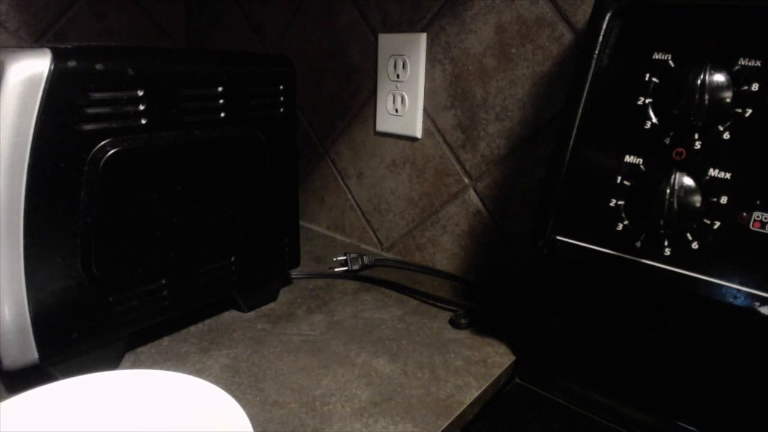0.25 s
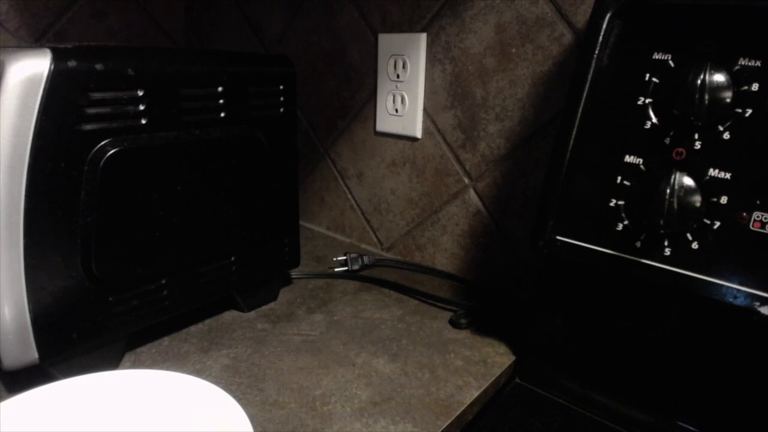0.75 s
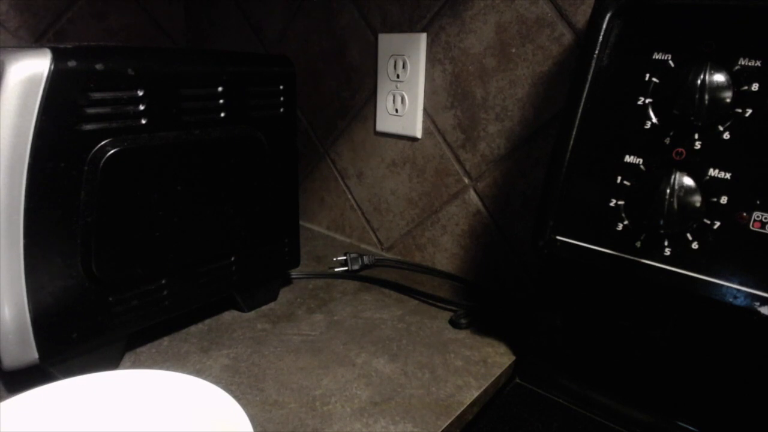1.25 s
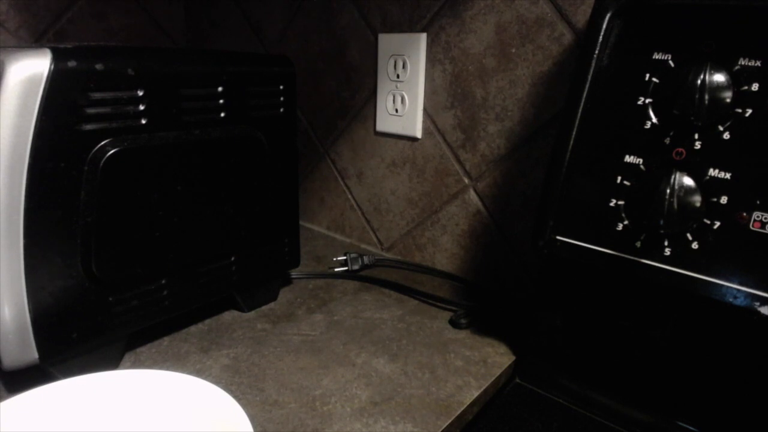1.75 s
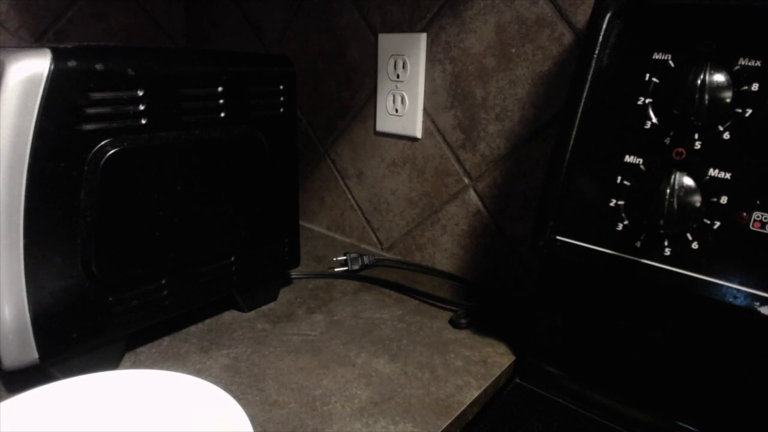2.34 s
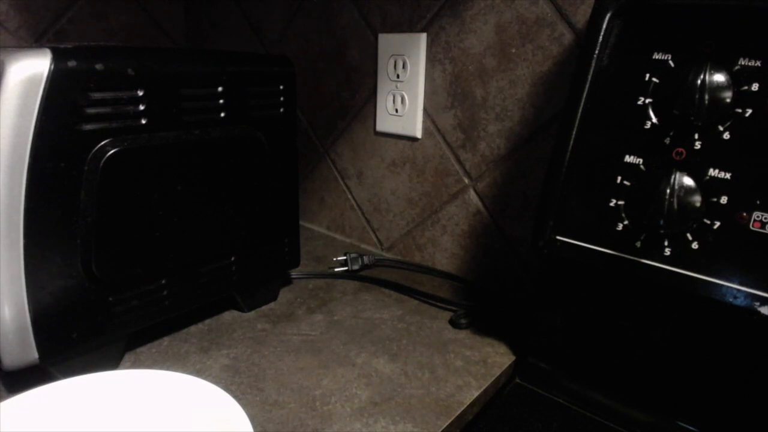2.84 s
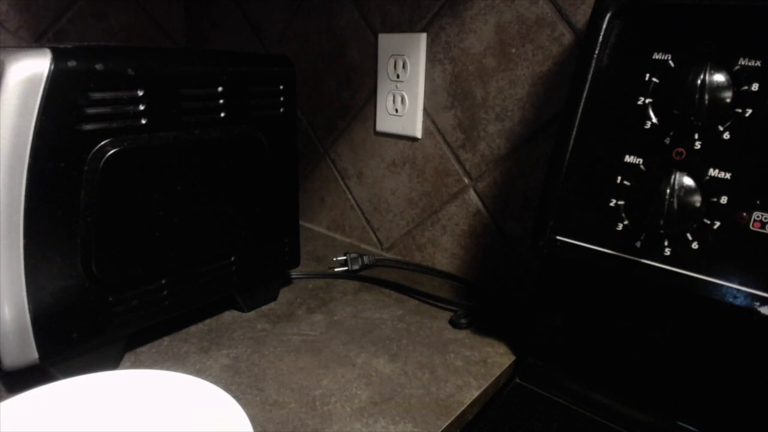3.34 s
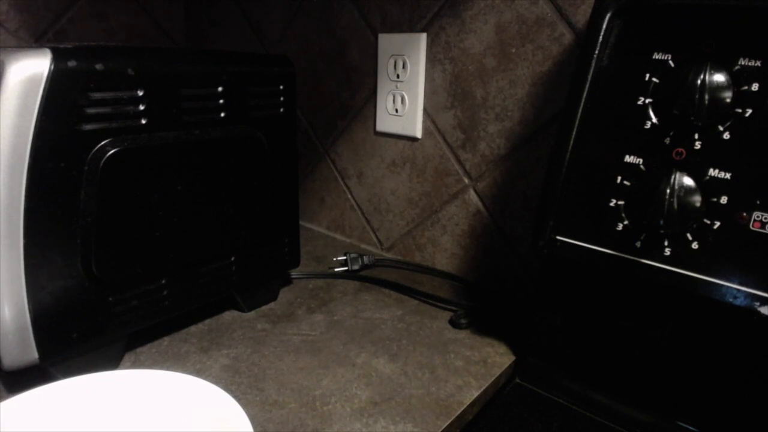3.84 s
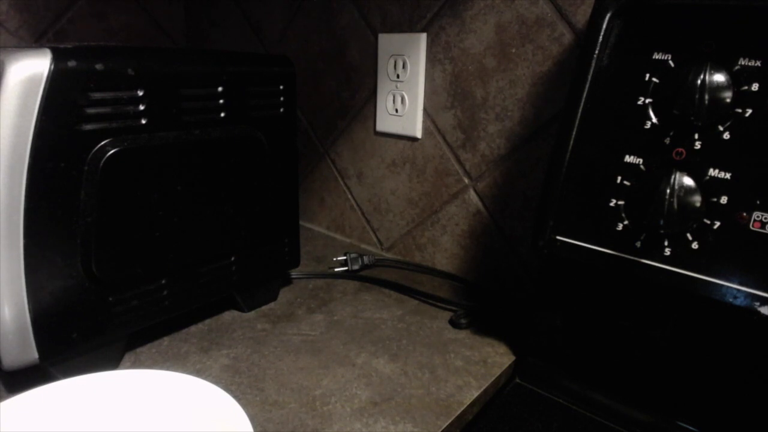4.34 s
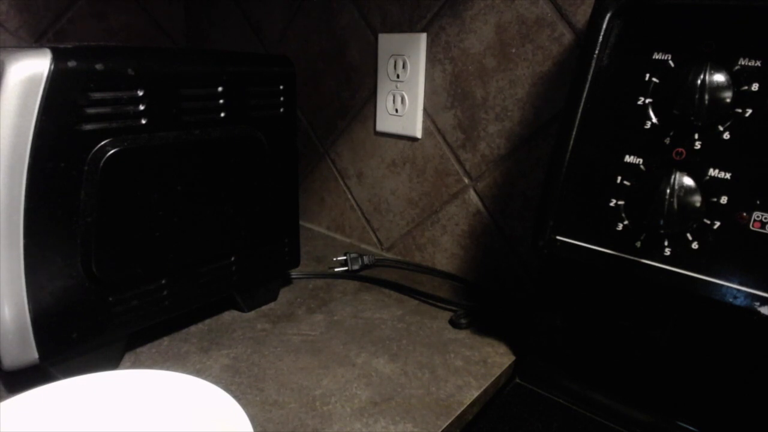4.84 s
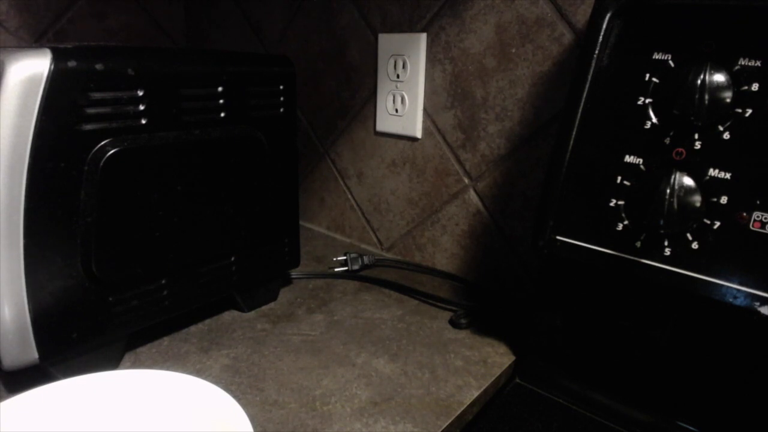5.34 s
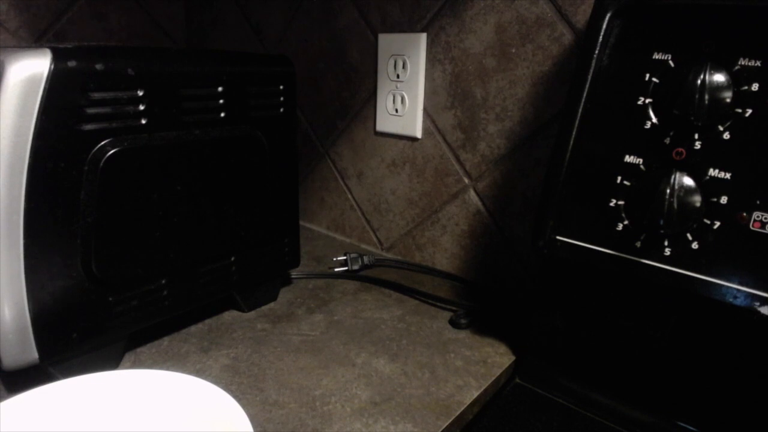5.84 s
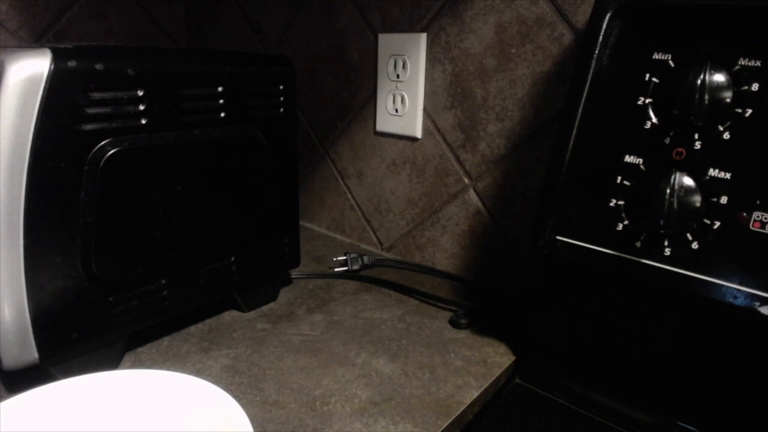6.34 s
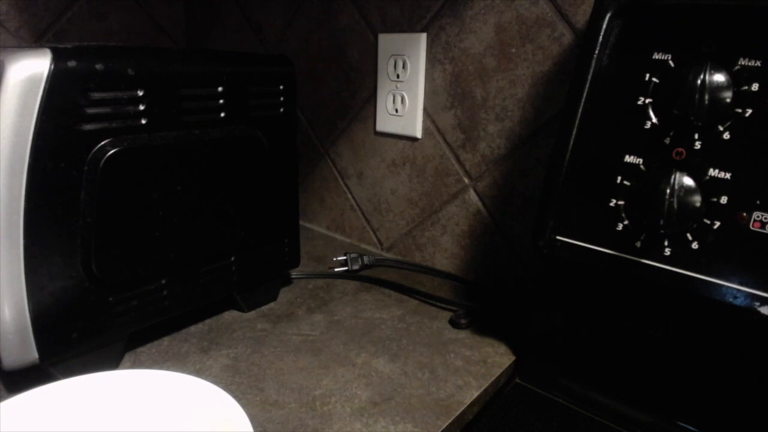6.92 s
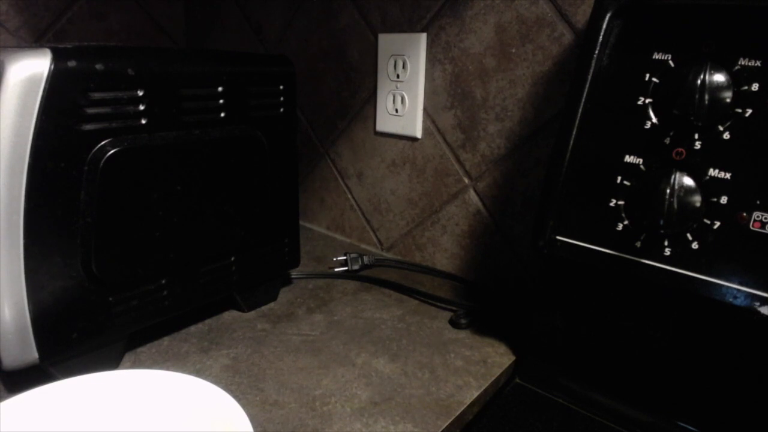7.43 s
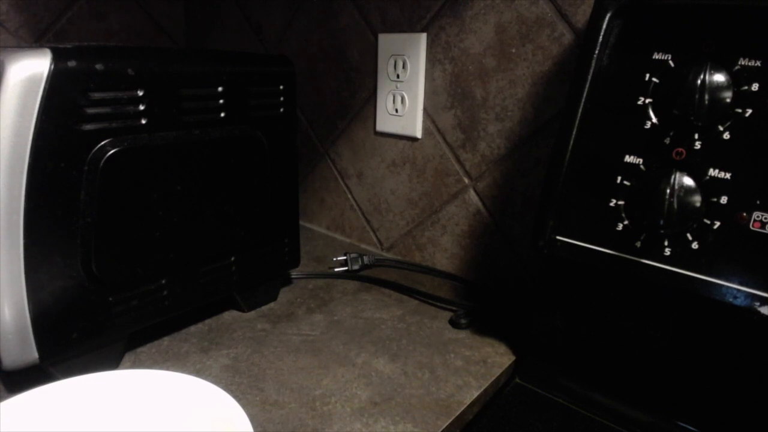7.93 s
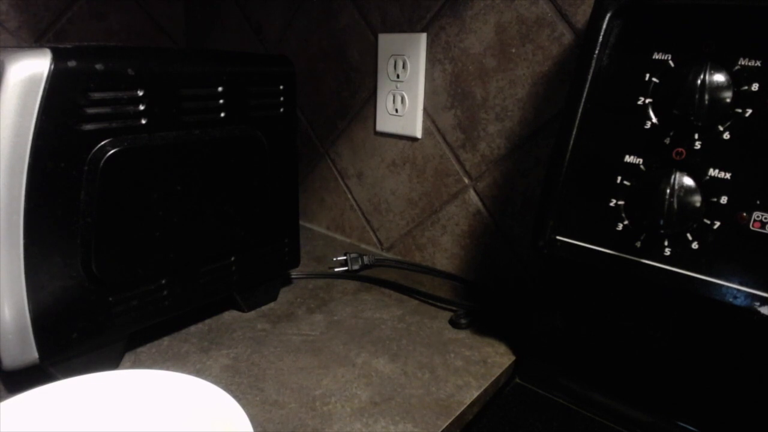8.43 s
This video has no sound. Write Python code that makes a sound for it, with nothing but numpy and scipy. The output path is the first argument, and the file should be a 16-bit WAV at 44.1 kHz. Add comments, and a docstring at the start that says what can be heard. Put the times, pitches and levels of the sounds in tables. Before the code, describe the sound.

A small, quiet kitchen with faint low room tone, heard by a close stereo pair, the source slightly left. From 0 to 1.3 s fingers brush a thin cardboard box in short dry swishes, with soft hollow bumps near 0.3 to 0.9 s. From 1.4 s scraping thickens with papery clicks and small boxy pops as the flap catches. At about 2.63 s it bursts free with by far the loudest sound, a deep hollow card crack, followed by knocks and rattly scrapes until 3.4 s. The box thumps on the counter near 3.37 and 3.74 s. A quieter moment holds faint plastic ticks. From 4.8 s a stiff liner is pulled: sharp bright snaps crowd 4.9 to 5.3 and 5.6 to 6.35 s, ease, then crackle strongly again around 7.2 to 7.8 s. Softer crinkles and dull pops continue, ending with a hollow snap near 8.67 s.

```python
"""Cereal box and liner

A cereal box is opened on a kitchen counter, close to a pair of microphones, in a small quiet room.
Fingers slide over the card (a hiss of small slips), the flap pops and scrapes free (bursts, clicks and
ringing facets), and the box bumps on the counter (ringing modes and a dead thud).
Then the stiff plastic liner is pulled about: sharp snaps and hollow knocks over a fine crinkle of creases.
"""
import sys
import numpy as np
from scipy import signal
from scipy.fft import rfft, irfft, next_fast_len
from scipy.io import wavfile

SR = 44100
rng = np.random.default_rng(int(sys.argv[2]) if len(sys.argv) > 2 else 0)


def transcribe(signal):
    """Save signal, clipped to [-1, 1], as a 16-bit WAV file at the path in sys.argv[1]."""
    frames = np.atleast_2d(signal).T
    limited = np.clip(frames, -1, 1)
    pcm = np.round(limited * 32767).astype(np.int16)
    wavfile.write(sys.argv[1], SR, pcm)


N = 383229
TIME = np.arange(N) / SR


def from_db(db):
    """Decibels to amplitude gain."""
    return 10 ** (np.asarray(db) / 20)


def rms_one(x):
    """Scale to rms 1."""
    return x / np.sqrt(np.mean(x ** 2) + 1e-20)


def energy_one(x):
    """Scale to a mean energy of 1 a channel."""
    return rms_one(x) / np.sqrt(x.shape[-1])


def butter(hz, kind, order=2):
    """A Butterworth filter, returned as a function of the sound."""
    sos = signal.butter(order, hz, kind, fs=SR, output="sos")
    return lambda x: signal.sosfilt(sos, x)


def resonator(hz, width_hz):
    """Coefficients of a two-pole resonance with about unit gain at its peak."""
    r = np.exp(-np.pi * width_hz / SR)
    zeros = np.array([1, 0, -1]) * (1 - r * r) / 2
    poles = [1, -2 * r * np.cos(2 * np.pi * hz / SR), r * r]
    return zeros, poles


def resonate(x, hz, width_hz):
    """A resonance at a steady pitch."""
    return signal.lfilter(*resonator(hz, width_hz), x)


def moving_ring(x, hz, width_hz, size=128):
    """A resonance whose centre glides, retuned every `size` samples without losing its ring."""
    out, state = np.zeros_like(x), np.zeros((2, 2))
    for i in range(0, x.shape[-1], size):
        block = x[:, i:i + size]
        out[:, i:i + size], state = signal.lfilter(*resonator(hz[i], width_hz), block, zi=state)
    return out


def add(out, start_s, x):
    """Mix x into out from start_s on."""
    at = int(np.clip(round(start_s * SR), 0, N - 1))
    out[:, at:at + x.shape[-1]] += x[..., :N - at]


def diffuse(count, apart_hz=1080):
    """Scattered sound at two microphones: alike in the bass, unrelated in the treble."""
    mid, side = rng.standard_normal((2, count))
    side = butter(apart_hz, "high", order=3)(side)
    return np.array([mid + side, mid - side])


def sheet_ranges(ranges_hz):
    """Overlapping filters for the body, crack and sizzle of a sheet."""
    return [butter(edges, "band") for edges in ranges_hz]


def gesture(start_s, length_s, change_db, attack_s, release_db_per_s):
    """Gain of one movement of the hand: it sets in, swells or eases evenly in dB, and dies away."""
    t = TIME - start_s
    swell_db = change_db * (np.clip(t / length_s, 0, 1) - .5)
    release_db = release_db_per_s * np.maximum(t - length_s, 0)
    return np.clip(t / attack_s, 0, 1) * from_db(swell_db - release_db)


def colours(colour_db, brightness_db):
    """Gains of body, crack and sizzle for each movement: brightness tips them about the crack."""
    tilt_db = np.outer([-1, 0, 1], brightness_db)
    return from_db(np.array(colour_db)[:, None] + tilt_db)


def grains(per_s, spread_db, t60, smooth, ring_db, ring_share, pitches_hz, tick_db=-8.0, count=18):
    """Tiny slips of uneven size: each a sharp tick with its own pitch and a fast-dying scatter, over a hiss."""
    struck = rng.random(N) < per_s / SR
    sizes = from_db(spread_db * np.minimum(rng.exponential(1, N), 3.5)) * struck
    power = signal.lfilter([1], [1, -from_db(-120 / (t60 * SR))], sizes ** 2 + 1e-18)
    ticks = rms_one(sizes * rng.choice([-1, 1], N))
    dealt, hiss = rng.integers(0, count, N), diffuse(N)  # each tick is dealt one of the pitches
    rings = 0
    for k, hz in enumerate(np.geomspace(*pitches_hz, count)):
        own_ticks = ticks * (dealt == k) + 1e-18 * hiss[0]  # never quite zero
        rings = rings + resonate(own_ticks, hz, ring_share * hz)
    scatter = hiss * np.sqrt(power / power.mean() + smooth)
    return scatter + from_db(tick_db) * ticks + from_db(ring_db) * rms_one(rings)


# spectrum of the room tone, only its shape counts: pitch_hz, density_db
ROOM_TONE_SHAPE = [(25, -8.5), (65, 6.5), (120, 5.5), (250, 0.5), (900, -1.5), (1800, -13), (3500, -18),
                   (7000, -22.5), (10000, -30), (14000, -28)]


def room_tone(level_db=-62):
    """The faint steady rush of the house: diffuse noise shaped over log frequency."""
    hz, db = np.transpose(ROOM_TONE_SHAPE)
    size = next_fast_len(N)
    bins_hz = np.fft.rfftfreq(size, 1 / SR)
    colour = from_db(np.interp(np.log(bins_hz + 1), np.log(hz), db))
    rush = irfft(rfft(diffuse(size)) * colour, size)[:, :N]
    return from_db(level_db) * rms_one(rush)


# how much the card catches instead of gliding, most while the flap tears free: time_s, share (0 to 1)
CATCHING_SHARE = [(0, 0.34), (1.35, 0.06), (1.7, 0.57), (2.6, 0.7), (2.75, .75), (3.3, 0.7), (3.5, 0.05)]


def card_slips():
    """Gliding card gives a dense, even swish; catching card gives coarse dry ticks."""
    glide = grains(per_s=4000, spread_db=2.5, t60=.03, smooth=.5, ring_db=-9, ring_share=.06,
                   pitches_hz=(500, 2500))
    catch = grains(per_s=420, spread_db=4.5, t60=0.027, smooth=0.06, ring_db=-1, ring_share=0.035,
                   pitches_hz=(420, 3000), tick_db=-2)
    share = np.interp(TIME, *np.transpose(CATCHING_SHARE))
    return np.sqrt(1 - share) * rms_one(glide) + np.sqrt(share) * rms_one(catch)


# ranges in which card sounds, one row each for body, crack and sizzle: low_hz, high_hz
CARD_RANGES_HZ = [(260, 1606), (1250, 4910), (4000, 9200)]
# ring of the card under the fingers, climbing until 1.65 s, then dropping unevenly, lowest at 2.7 s:
# time_s, pitch_hz
PANEL_PITCH = [(0, 705), (.9, 922), (1.15, 1163), (1.65, 1280), (1.9, 946), (2.15, 1086), (2.4, 793),
               (2.7, 447), (2.95, 500), (3.2, 612), (3.5, 486), (3.9, 586)]
# balance of a stroke: body_db, crack_db, sizzle_db
CARD_BALANCE = (6, 1.5, -11.5)
# strokes of fingers and flap over the card:
# start_s, length_s, level_db (before colour), change_db (over the stroke), brightness_db,
# rumble_db (against the level)
CARD_STROKES = [(0, 0.22, -60.5, -10.5, -1.5, 5), (0.253, 0.072, -40.5, 3.5, 3, -38),
                (0.316, 0.023, -55.5, -14, -35, -21), (0.65, 0.13, -55, -3, 4, -27),
                (0.766, 0.12, -42.5, 3, 0.5, 3.5), (0.934, 0.12, -48, -1, 1.5, -38),
                (1.065, 0.049, -46, 6, 2, -25), (1.196, 0.056, -39.5, 4, 2, -2.5),
                (1.25, 0.082, -54, 2, 9, -32), (1.342, 0.16, -84.5, 4, 27, -9),
                (1.611, 0.19, -44.5, 6, 2.5, -2), (1.831, 0.087, -35.5, 4, 4, -39),
                (1.982, 0.074, -43, -4, 3, -27), (2.086, 0.19, -42, -7, 1.5, -10),
                (2.325, 0.076, -44, -7, 0.5, -20.5), (2.397, 0.2, -45, -4.5, -0.5, -13.5),
                (2.62, 0.18, -27, -8, 4.5, -10.5), (2.798, 0.17, -42, 13.5, 3.5, -43),
                (2.952, 0.18, -37.5, 6, 1, -9.5), (3.15, 0.11, -38.5, 2.5, 4, -16),
                (3.28, 0.27, -56, 3, 0.5, -3), (3.437, 0.089, -42.5, -6, 5, -13),
                (3.602, 0.095, -47.5, -12, 7, -13), (3.71, 0.047, -42.5, 6, 3.5, 2.5)]


def cardboard_slide(ring_db=10, soft_hz=2000, top_hz=10500, attack_s=0.023, release_db_per_s=356):
    """Fibres catch and slip; the panel's pitch follows the grip, and the soft card dulls the top."""
    _, _, db, _, brightness_db, rumble_db = np.transpose(CARD_STROKES)
    strokes = np.array([gesture(start, length, change, attack_s, release_db_per_s)
                        for start, length, _, change, _, _ in CARD_STROKES])
    # a brighter stroke is a faster, louder one
    stroke_gains = colours(CARD_BALANCE, brightness_db) * from_db(db + brightness_db / 2)
    gains = stroke_gains @ strokes
    slips = butter(soft_hz, "low", order=1)(card_slips())
    slips = butter(top_hz, "low")(slips)
    panel_hz = np.interp(TIME, *np.transpose(PANEL_PITCH))
    slips = slips + from_db(ring_db) * moving_ring(slips, panel_hz, width_hz=480)
    scrape = sum(gain * rms_one(band(slips)) for gain, band in zip(gains, sheet_ranges(CARD_RANGES_HZ)))
    rumble_gain = from_db(db + rumble_db) @ strokes
    rumble = rumble_gain * rms_one(butter([120, 360], "band")(slips))
    return scrape + rumble


def buckles(rows, ranges_hz, t60, ring_db, ring_share, sharp_share, facet_db, facet_q,
            tick_db=-8, ticks_per_s=250, size=4096, count=8):
    """A sheet flips: a dry click and its counter echo, in a cluster of small ones that ring the freed facets."""
    abrupt_s = 0.001  # a flip with this swell has half the full share of click
    echo_s, echo_db = 0.00071, -2  # the counter throws each click back, give or take a fifth in time
    level_window_s = .01  # each level is the snap's energy spread over this time
    out, t, ranges = np.zeros((2, N)), np.arange(size) / SR, sheet_ranges(ranges_hz)
    scatter = diffuse(len(rows) * size).reshape(2, -1, size)
    no_bass = butter(1210, "high")  # keeps low pitches out of the crack range
    toward = np.array([1.15, .85])  # clicks and ticks are stronger on the left
    for k, (start_s, *levels_db, hz, swell) in enumerate(rows):
        swell = np.clip(swell, 1e-4, .03)
        sharp = sharp_share / (1 + swell / abrupt_s)
        decay = from_db(-60 * np.maximum(t - swell, 0) / t60)
        shape = np.minimum(0.35 + 0.21 * t / swell, 1) * decay

        # creases nearby let go one by one
        ticks = rng.standard_normal(size) * (rng.random(size) < ticks_per_s / SR) * shape
        burst = energy_one(scatter[:, k] * shape) + from_db(tick_db) * ticks * toward[:, None]
        # neighbouring facets add pitches of their own, new at every snap
        pitches = np.geomspace(620, 6300, count) * 2 ** rng.uniform(-0.43, .3, count)
        facets = sum(resonate(burst, pitch, pitch / facet_q) for pitch in pitches)
        ring = resonate(burst, hz, ring_share * hz)
        burst = burst + from_db(ring_db) * ring + from_db(facet_db) * facets

        click = np.zeros((2, size))
        click[:, int(swell * SR)] = toward
        echo_at = int((swell + echo_s * rng.uniform(.8, 1.2)) * SR)
        click[:, echo_at] += from_db(echo_db) * toward
        click = click + 2 * resonate(click, hz, hz / 2)

        for share, x in (1 - sharp, burst), (sharp, click):
            feeds = (x, no_bass(x), x)  # body, crack, sizzle
            parts = [from_db(db) * energy_one(band(feed))
                     for db, band, feed in zip(levels_db, ranges, feeds)]
            add(out, start_s, sum(parts) * np.sqrt(share * level_window_s * SR))
    return out


# cracks of the card, levels before the hollow and the room:
# start_s, body_db, crack_db, sizzle_db, panel_ring_hz, swell_s (held within 0.0001 to 0.03)
CARD_CRACKS = [(.274, -25, -27.5, -80, 1770, 0.022), (.5098, -31, -55, -67, 690, 0.003),
               (1.086, -38, -39.5, -74, 1080, 0), (1.121, -35.5, -65, -61, 880, 0),
               (1.158, -34.5, -43.5, -70, 1270, 0.0047), (1.1745, -30, -39, -54, 1070, 0.00079),
               (1.3922, -35, -28.5, -41, 2670, 0), (1.439, -41.5, -37, -49, 2180, 0.00091),
               (1.566, -46, -44, -58, 1390, .002), (1.57, -32.5, -29.5, -34.5, 1390, 0.0015),
               (1.606, -28.5, -26.5, -32, 1230, 0.011), (1.671, -34, -30, -41, 2000, 0.022),
               (1.707, -27, -26, -32.5, 2210, 0.001), (1.764, -35, -34, -41, 2130, 0.0051),
               (1.828, -32, -39.5, -47, 845, 0.0012), (1.856, -25.5, -26.5, -55, 1440, 0.0042),
               (1.926, -57, -62, -35.5, 1740, 0.00062), (2.042, -27, -26, -34, 2050, 0.00084),
               (2.057, -31, -34.5, -37, 750, 0), (2.123, -50, -43, -45, 1010, 0),
               (2.142, -54, -37.5, -52, 1060, 0.0049), (2.2126, -59, -38.5, -43, 2070, 0.0022),
               (2.282, -31, -37.5, -44, 920, 0.00092), (2.424, -64, -43, -47, 490, 0.015),
               (2.468, -35, -31, -33, 890, 0.0064), (2.494, -40, -46, -40, 816, 0.0025),
               (2.5251, -24, -24, -34, 2050, 0.002), (2.539, -29.5, -32.5, -36, 776, 0),
               (2.6235, -34.5, -30, -36, 1500, 0.0072), (2.6283, -10.5, -8, -12, 940, 0),
               (2.642, -20, -32, -32, 950, 0.065), (2.672, -25, -25.5, -26, 390, 0.013),
               (2.691, -33, -33, -30, 1300, 0.013), (2.752, -29.5, -28, -34, 1200, 0),
               (2.795, -51, -32, -32, 8200, 0), (2.82, -41, -32, -50, 1200, 0.00087),
               (2.94, -21, -34, -48, 650, 0.0038), (2.951, -32, -29.5, -50, 696, 0.00032),
               (3.03, -33, -36, -57, 3400, 0.0028), (3.086, -33, -29, -36, 2000, 0.0016),
               (3.153, -35, -35, -46, 1860, 0), (3.177, -31, -37, -52, 1010, 0.0044),
               (3.211, -29.5, -26.5, -36, 2300, 0.0024), (3.2655, -32, -28, -29, 3660, 0.002),
               (3.301, -40, -41, -41, 970, 0), (3.37, -25.5, -41, -54, 920, 0.003),
               (3.5822, -38, -41.5, -55, 468, 0), (3.649, -36, -36.5, -42, 1300, 0.0031)]


def box_cracks():
    """Stiff card buckles with a broad, strong panel ring and little click."""
    return buckles(CARD_CRACKS, CARD_RANGES_HZ, t60=0.069, ring_db=15.5, ring_share=0.36,
                   sharp_share=0.084, facet_db=-1.0, facet_q=33)


# modes of the box on the counter: pitch_hz, level_db (relative), t60_s (before each blow's ring length)
BOX_RING_MODES = [(121, 0, 0.15), (219.3, 0, 0.12), (390, 2.5, 0.14), (487, -6, 0.09), (885, -7.5, 0.11),
                  (1300, -15.5, 0.09)]
# blows on the box, soft and hard, peaks before the room:
# start_s, peak_db, contact_s, ring_length (times the modes' own), pitch (times the modes' own),
# thud_peak_db (of the counter)
BOX_BLOWS = [(0.283, -30, 0.0006, 2, 1, -46), (0.319, -21, 0.003, 0.79, 1.12, -24.5),
             (0.397, -35, 0.0025, 0.66, 1.23, -44), (0.508, -32, 0.0026, 0.69, 0.94, -36.5),
             (0.677, -36, 0.0031, 0.8, 1.06, -55), (.689, -34.5, 0.0044, 0.88, 1.02, -49),
             (.868, -32, 0.0019, 1, 1.2, -44), (1.234, -32, 0.0013, 1.1, 2.02, -53),
             (1.577, -29.5, 0.0028, 0.47, 2.2, -56), (2.529, -26, 0.0013, 0.35, 1.2, -43),
             (2.630, -21, 0.00025, 1.1, 2, -35), (2.672, -9, 0.002, 0.36, 2.05, -33),
             (3.364, -24, 0.0026, 0.45, 0.74, -23.5), (3.369, -17.5, 0.00071, 0.51, 0.87, -50),
             (3.374, -19, 0.001, 0.67, 0.99, -44), (3.72, -31, 0.0024, 0.41, 2.2, -55),
             (3.7398, -11, 0.0045, 0.59, 1.03, -26), (3.748, -22, 0.0076, 0.89, 0.98, -27)]


def bumps(radiate_hz=90, thud_hz=82, size=12000):
    """A blow rings the box's modes, the duller the longer the contact; the counter adds a dead thud."""
    out, t = np.zeros((2, N)), np.arange(size) / SR
    for start_s, db, contact_s, length, pitch, thud_db in BOX_BLOWS:
        ring = np.zeros(size)
        for k, (hz, level_db, t60) in enumerate(BOX_RING_MODES):
            decay = from_db(level_db - 60 * t / (t60 * length))
            ring += (-1) ** k * decay * np.sin(2 * np.pi * hz * pitch * t)
        push = signal.windows.hann(max(int(contact_s * SR), 3))
        blow = signal.fftconvolve(ring, push)
        blow = butter(radiate_hz, "high", order=3)(blow)  # a small box moves little air in the deep bass
        thud = resonate(np.pad(push, (0, size)), thud_hz, width_hz=40)
        thud = butter(115, "low")(thud)
        add(out, start_s, from_db(db) * blow / np.abs(blow).max())
        add(out, start_s, from_db(thud_db) * thud / np.abs(thud).max())
    return out


# short rustling rings, steady or gliding, of rubbed patches and of snaps and knocks ringing on,
# levels before the room: start_s, length_s, level_db, first_hz, last_hz
RUSTLING_RINGS = [(0.326, 0.019, -44, 2480, 2500), (0.732, 0.11, -42.5, 860, 1050),
                  (0.749, 0.15, -46.5, 3220, 2830), (0.8, 0.035, -57.5, 4470, 5000),
                  (.83, 0.072, -42.5, 1630, 1790), (0.788, 0.073, -41.5, 420, 460),
                  (0.946, 0.22, -57, 4360, 4500), (0.955, 0.083, -48.5, 1200, 1190),
                  (1.233, 0.054, -44.5, 4000, 4400), (1.295, 0.043, -49, 440, 460),
                  (1.914, 0.16, -49.5, 318, 470), (2.274, 0.077, -42, 870, 700),
                  (2.637, 0.13, -44, 1620, 1730), (2.64, 0.052, -30, 285, 280),
                  (6.622, 0.013, -44, 1780, 1750), (6.683, .014, -45, 2000, 1990),
                  (2.93, 0.064, -43, 4060, 4460), (3.018, 0.049, -44, 3740, 3030),
                  (3.027, 0.17, -41, 1240, 1210), (3.11, 0.032, -44, 1870, 1740),
                  (3.197, 0.05, -36, 915, 890), (3.505, 0.08, -49, 446, 470),
                  (3.699, 0.075, -45.5, 480, 563), (4.921, 0.049, -37, 2480, 2480),
                  (4.945, 0.012, -33.5, 5000, 5000), (5.212, 0.017, -32.5, 2300, 2300),
                  (5.225, 0.034, -46, 2410, 2360), (5.069, 0.017, -36, 2210, 2200),
                  (4.975, 0.0158, -25.5, 1370, 1350), (4.992, 0.028, -40, 1400, 1400),
                  (5.777, 0.063, -44.5, 495, 410), (6.805, 0.058, -47.5, 416, 490),
                  (6.879, 0.017, -52, 850, 900), (7.606, 0.069, -34.5, 3000, 2200),
                  (7.697, 0.027, -36, 2700, 2400), (7.769, 0.02, -37, 2050, 1950),
                  (7.873, 0.2, -51, 804, 875), (8.13, 0.11, -45.5, 553, 287),
                  (8.471, 0.027, -43, 1470, 1670)]


def rustling_rings(ring_share=.45, fade_share=0.37):
    """A run of little slips, heard through a short ring that holds its pitch or glides."""
    out = np.zeros((2, N))
    slips = grains(per_s=900, spread_db=-2.0, t60=0.036, smooth=0.23, ring_db=-11.5, ring_share=0.17,
                   pitches_hz=(400, 6000))
    for start_s, length_s, db, first_hz, last_hz in RUSTLING_RINGS:
        run = slips[:, int(start_s * SR):int((start_s + length_s) * SR)]
        hz = np.geomspace(first_hz, last_hz, run.shape[-1])
        width_hz = ring_share * hz.mean()
        run = moving_ring(run, hz, width_hz)
        run = moving_ring(run, hz, width_hz)  # twice for steeper skirts
        faded = run * signal.windows.tukey(len(hz), fade_share)
        add(out, start_s, from_db(db) * rms_one(faded))
    return out


# ranges in which film sounds, one row each for body, crack and sizzle: low_hz, high_hz
FILM_RANGES_HZ = [(390, 1557), (1200, 5200), (4400, 9100)]
# snaps of the liner, levels before the hollow and the room:
# start_s, body_db, crack_db, sizzle_db, film_ring_hz, swell_s (held within 0.0001 to 0.03)
LINER_SNAPS = [(.6042, -40.5, -34, -40.5, 1830, 0.00083), (3.892, -45.5, -37.5, -42, 6240, 0.003),
               (4.065, -46, -43.5, -49, 1330, 0.0046), (4.097, -59.5, -50.5, -57.5, 2400, 0),
               (4.1677, -51, -41.5, -30, 9470, 0.0041), (4.309, -63, -55.5, -55.5, 6000, .002),
               (4.3377, -60, -34.5, -54, 5160, 0.00074), (4.3685, -63.5, -39.5, -60.5, 4630, 0),
               (4.482, -65.5, -52, -59, 4180, 0.0035), (4.5328, -56.5, -44, -48.5, 3460, 0),
               (4.62, -66, -50, -52.5, 4430, .003), (4.642, -55, -45, -54, 3600, 0.0086),
               (4.6637, -60.5, -40.5, -81.5, 2000, 0.00013), (4.552, -40.5, -32.5, -43, 2360, 0.0032),
               (4.6934, -51.5, -34, -35.5, 4500, 0.0028), (4.7669, -41, -35, -40, 6040, 0.022),
               (4.7848, -35, -44, -40, 2360, 0.019), (4.85, -33, -30, -30.5, 2160, 0.0093),
               (4.9034, -32.5, -22, -29, 1940, 0.00093), (4.9732, -26, -19, -27, 2000, 0.0009),
               (5.0189, -31, -18, -19, 5000, 0.0027), (5.0552, -50, -30, -31, 2240, 0.039),
               (5.072, -31.5, -20.5, -33, 2070, 0.0051), (5.136, -45, -37.5, -48, 2300, 0),
               (5.2135, -38.5, -33.5, -36, 2300, 0.0033), (5.2527, -40, -28.5, -45, 2320, 0.0013),
               (5.267, -41, -23, -24.5, 4240, 0.0015), (5.275, -33.5, -20, -24.5, 4260, 0.0098),
               (5.287, -29.5, -20.5, -22, 4080, 0.0031), (5.311, -30, -25, -32, 2500, 0.014),
               (5.3315, -30, -24, -29, 5900, 0), (5.615, -43.5, -39.5, -57, 2200, 0.011),
               (5.6432, -30.5, -27.5, -31.5, 1960, 0.017), (5.6728, -41, -23, -26, 4620, 0.00072),
               (5.7162, -60, -59, -33.5, 5430, 0), (5.75, -55, -36, -46, 5000, 0.0035),
               (5.7905, -40, -29.5, -33, 3430, 0.0038), (5.8311, -30.5, -27.5, -38, 1860, 0.0029),
               (5.8568, -33, -30, -51, 4020, 0.00037), (5.9195, -51, -44, -47, 3300, .002),
               (5.924, -43, -21.5, -21.5, 4000, 0.0022), (5.9783, -26, -18, -26, 6200, 0.00072),
               (6.008, -31.5, -32, -60, 2110, 0.013), (6.0496, -27, -19.5, -23.5, 3760, 0.0029),
               (6.106, -56, -39, -38, 4500, 0.0025), (6.1352, -36, -28, -30, 5560, 0),
               (6.1472, -33, -23.5, -22.5, 5300, 0.0043), (6.176, -34.5, -34.5, -37, 880, 0.0029),
               (6.202, -47, -38, -41, 7050, 0), (6.303, -41, -25, -32, 1910, 0.0015),
               (6.3258, -36.5, -14.5, -18.5, 5600, 0.0012), (6.3593, -33, -32.5, -41, 1210, 0),
               (6.6195, -43, -33.5, -39, 1740, 0.00025), (6.7174, -35, -29, -29, 1970, 0.013),
               (6.883, -53, -45.5, -55, 1870, 0.0037), (6.903, -56, -46, -43, 6500, .002),
               (6.921, -58, -40, -53, 4800, .002), (6.991, -34.5, -36, -47, 695, 0.011),
               (7.0036, -42, -30, -34, 8200, 0.0011), (7.0925, -51, -34, -34, 5450, 0.0053),
               (7.1112, -47, -26, -34, 3360, 0.0034), (7.2045, -47.5, -27, -37, 4160, 0.0024),
               (7.2666, -32, -22.5, -58, 2170, 0.014), (7.25, -39.5, -37, -54, 2600, 0.011),
               (7.305, -43, -26, -24.5, 6260, 0.0077), (7.3345, -43, -31, -60, 6600, 0.011),
               (7.3881, -53, -56, -37.5, 6100, 0), (7.4256, -30, -18.5, -23.5, 3250, 0.0091),
               (7.4642, -32, -22.5, -38, 2700, 0.00086), (7.58, -59, -53, -55, 4000, .002),
               (7.6045, -54, -32.5, -43, 2940, 0.00059), (7.62, -41, -20.5, -22.5, 3140, 0.011),
               (7.635, -46, -21.5, -29, 2390, 0.0031), (7.7003, -47, -29, -29, 2450, 0.0037),
               (7.72, -26.5, -18.5, -31, 2300, 0.0005), (7.7735, -31, -42, -62, 1850, 0.038),
               (7.791, -26, -24.5, -30, 950, 0.0034), (7.928, -49, -34, -36, 4000, 0.0022),
               (7.947, -51, -32.5, -37, 3800, 0.0015), (7.9616, -46, -30, -32, 2200, 0.0049),
               (7.985, -47, -34, -33.5, 4530, 0.01), (8.015, -35, -35.5, -62, 1190, 0.001),
               (8.05, -56, -41.5, -50, 2320, 0.0035), (8.11, -56, -43, -42, 5000, 0.019),
               (8.1368, -36.5, -27, -27, 6400, 0.00064), (8.185, -27.5, -29, -60, 1220, 0.0017),
               (8.2783, -37, -30.5, -68, 1920, 0.022), (8.325, -39, -36, -63, 920, 0.016),
               (8.425, -60, -47, -44.5, 2410, 0.0016), (8.478, -39, -39, -41, 1520, 0.0019),
               (8.545, -49, -48, -52, 5500, 0.00055), (8.5693, -44.5, -45, -35, 6840, 0.00099),
               (8.6675, -32.5, -25.5, -33, 2260, 0.0026)]


def liner_snaps():
    """Stiff film buckles with a larger share of click and louder facets than the card."""
    return buckles(LINER_SNAPS, FILM_RANGES_HZ, t60=0.054, ring_db=9.0, ring_share=0.19,
                   sharp_share=.3, facet_db=7, facet_q=25.7)


# a whole panel of card or film flips with a hollow knock, peaks before the room:
# start_s, peak_db, pitch_hz, width_hz, push_s
PANEL_KNOCKS = [(1.174, -38, 1040, 130, 0.0061), (1.569, -24.5, 1310, 170, 0.011),
                (1.829, -26, 840, 160, 0.0042), (1.889, -25.5, 406, 70, 0.0068),
                (2.141, -23, 970, 170, 0.0072), (2.283, -30, 590, 80, 0.011), (2.426, -34, 392, 60, 0.013),
                (2.6286, -3, 488, 128, 0.0061), (2.689, -17, 520, 130, 0.0083),
                (2.752, -17.5, 577, 130, 0.0047), (2.8214, -12, 467, 316, 0.0052),
                (2.912, -23, 554, 90, 0.004), (3.096, -17, 520, 120, 0.0023),
                (3.267, -20.5, 492, 130, 0.0034), (3.371, -20, 903, 200, 0.0085),
                (3.617, -48, 424, 60, 0.0088), (4.856, -27, 674, 149.5, 0.0027),
                (4.902, -15.5, 920, 120, 0.0034), (4.9716, -14, 1330, 200, 0.01),
                (5.213, -22, 2420, 130, 0.0038), (5.2153, -23.5, 1850, 150, 0.0035),
                (5.98, -29.5, 823, 200, 0.012), (6.043, -23, 570, 130, 0.0071),
                (6.244, -29, 1130, 129, 0.0038), (6.327, -20, 577, 111, 0.0082),
                (6.592, -32, 1180, 69.3, 0.011), (6.621, -33, 1775, 130, 0.0043),
                (6.655, -34.5, 920, 121, 0.005), (6.682, -26, 1930, 150, 0.0043),
                (7.243, -32.5, 1400, 200, 0.0064), (7.653, -35, 1400, 200, 0.0057),
                (7.7206, -15.5, 1030, 300, 0.0022), (7.793, -21, 1120, 140, .008),
                (7.793, -25, 737, 110, 0.0057), (7.962, -28, 885, 149, 0.0052),
                (8.015, -38, 514, 100, 0.0042), (8.263, -29, 770, 130, 0.0036),
                (8.342, -34.5, 432, 80, 0.0075), (8.44, -41, 1200, 150, 0.011),
                (8.666, -14.5, 950, 170.3, 0.0027)]


def knocks(rough=1.0, skew=0.95, size=4096):
    """A flipping panel is shoved unevenly, hardest just before mid-push, then rings out within a few cycles."""
    out, t = np.zeros((2, N)), np.arange(size) / SR
    all_jolts = rng.standard_normal((len(PANEL_KNOCKS), size))
    for (start_s, db, hz, width_hz, push_s), jolts in zip(PANEL_KNOCKS, all_jolts):
        shove = np.sin(np.pi * np.minimum(t / push_s, 1) ** skew)
        unevenness = rough * rms_one(resonate(jolts, hz, hz))
        drive = shove * (np.sin(2 * np.pi * hz * t) + unevenness)
        knock = resonate(drive, hz, width_hz)
        add(out, start_s, from_db(db) * knock / np.abs(knock).max())
    return out


# balance of a pull: body_db, crack_db, sizzle_db
FILM_BALANCE = (-4.5, 0.5, -5.5)
# pulls on the liner: start_s, length_s, level_db (before colour), change_db (over the pull), brightness_db
LINER_PULLS = [(3.923, 0.22, -55.5, -5, -1.5), (4.218, 0.039, -52, -7, -2), (4.614, 0.15, -55.5, -0.5, -1),
               (4.777, 0.15, -45, -4, -3.5), (4.907, 0.13, -42, 8, 2), (5.029, 0.072, -40, 0, 0.5),
               (5.275, 0.059, -32, -1, -2), (5.494, 0.025, -48.5, -1.5, 0), (5.628, 0.21, -47.5, -6.5, -3),
               (5.791, 0.062, -56, 7, -13.5), (5.914, 0.13, -40.5, 10, 1), (6.059, 0.15, -43, -12, 4),
               (6.292, 0.058, -35.5, -15.5, -4.5), (6.575, 0.19, -45.5, -3.5, -1.5),
               (6.789, 0.28, -59.5, 1, -9), (6.884, 0.12, -53.5, -16, -3.5), (6.976, 0.22, -49, -12, 2),
               (7.208, 0.059, -45, -10, 7), (7.415, 0.028, -35, 2, 4.5), (7.547, 0.047, -50.5, 7.5, -3),
               (7.62, 0.14, -43.5, -2, 2), (7.954, 0.16, -46, -16, -0.5), (8.107, 0.086, -40, 15.5, 1),
               (8.24, 0.13, -48, -7, -8.5), (8.403, 0.12, -53.5, -13, -8.5), (8.532, 0.11, -48.5, 14, -1.5),
               (8.654, 0.031, -40, -23, 1)]


def liner_crinkle(handling_db=-15.0, soft_hz=4000, attack_s=0.022, release_db_per_s=310.5):
    """Small creases keep giving way while the liner is pulled; the box around it rumbles along."""
    held_from_s, held_db, held_brightness_db = 4.72, -61.5, -0.5  # it creases faintly between pulls too
    _, _, db, _, brightness_db = np.transpose(LINER_PULLS)
    pulls = np.array([gesture(start, length, change, attack_s, release_db_per_s)
                      for start, length, _, change, _ in LINER_PULLS])
    pulled = (colours(FILM_BALANCE, brightness_db) * from_db(db)) @ pulls
    held = from_db(held_db) * colours(FILM_BALANCE, held_brightness_db) * (TIME > held_from_s)
    gains = np.maximum(pulled, held)
    creases = grains(per_s=380, spread_db=3.0, t60=0.042, smooth=0.27, ring_db=-1.5, ring_share=0.074,
                     pitches_hz=(500, 4500))
    creases = butter(soft_hz, "low", order=1)(creases)
    film = sum(gain * rms_one(band(creases)) for gain, band in zip(gains, sheet_ranges(FILM_RANGES_HZ)))
    handling = gains[0] * from_db(handling_db) * rms_one(butter([75, 230], "band")(creases))
    return film + handling


# hollow of the box and the counter's corner, applied one after another: pitch_hz, width_hz, gain_db
HOLLOW_RESONANCES = [(268, 29, 7), (334, 25, -5.5), (410, 23, 5), (570, 27, 3.5), (649, 150, -4),
                     (826, 8.2, -1.5), (1190, 330, 1.5), (1495, 50, -6.5), (1730, 150, 1.5), (2185, 600, 2),
                     (2770, 70, -7.5), (3127, 65, 3.5), (3540, 86, 1.5), (4000, 880, 0),
                     (7200, 41000, -4.5)]


def hollow(x):
    """Standing waves lift some pitches and weaken others."""
    for hz, width_hz, db in HOLLOW_RESONANCES:
        x = x + (from_db(db) - 1) * resonate(x, hz, width_hz)
    return x


def kitchen(x, t60=0.22, wet_db=-17.0, wall_hz=7500, first_s=0.013, size=22000):
    """Dense reflections build up around first_s and die away; the walls dull them."""
    t = np.arange(size) / SR
    build_up = np.clip(t / first_s - .5, 0, 1)
    tail = diffuse(size) * build_up * from_db(-60 * t / t60)
    tail = butter(wall_hz, "low", order=1)(energy_one(tail))
    return x + from_db(wet_db) * signal.fftconvolve(x, tail, axes=1)[:, :N]


def scene(lag_s=0.00021, left_db=.75):
    """Box and liner stand a little to the left, so the right microphone hears them later and softer."""
    sheets = cardboard_slide() + box_cracks() + liner_snaps() + liner_crinkle()
    left, right = kitchen(hollow(sheets) + bumps() + rustling_rings() + knocks())
    right = np.pad(right, (round(lag_s * SR), 0))[:N]
    return np.array([left * from_db(left_db), right * from_db(-left_db)]) + room_tone()


def record(dry, top_hz=12500, cutoff_hz=15800):
    """The microphones dull the top, the loudest peaks clip, and the band ends steeply."""
    heard = np.clip(butter(top_hz, "low")(dry), -1, 1)
    steep = signal.ellip(10, .1, 80, cutoff_hz, fs=SR, output="sos")
    return signal.sosfilt(steep, heard)


dry = scene()
out = record(dry)
transcribe(out)
```